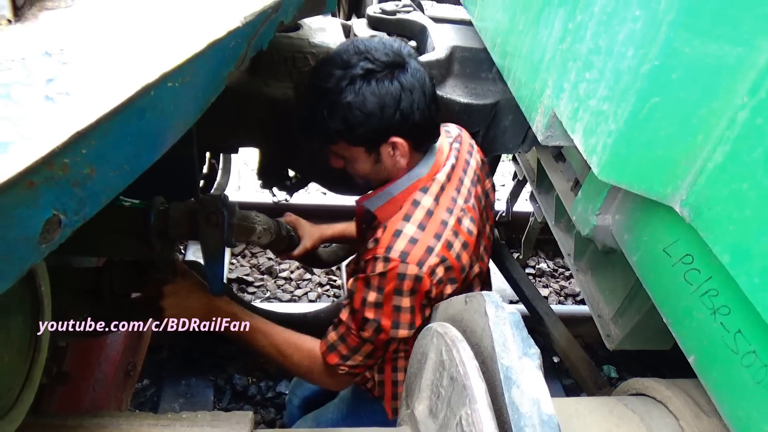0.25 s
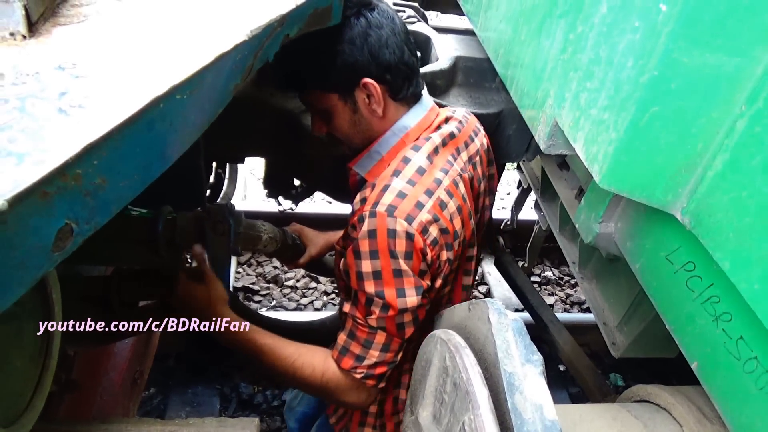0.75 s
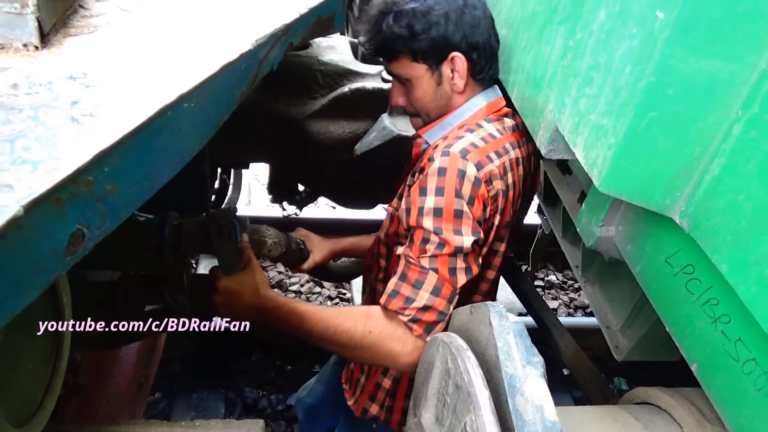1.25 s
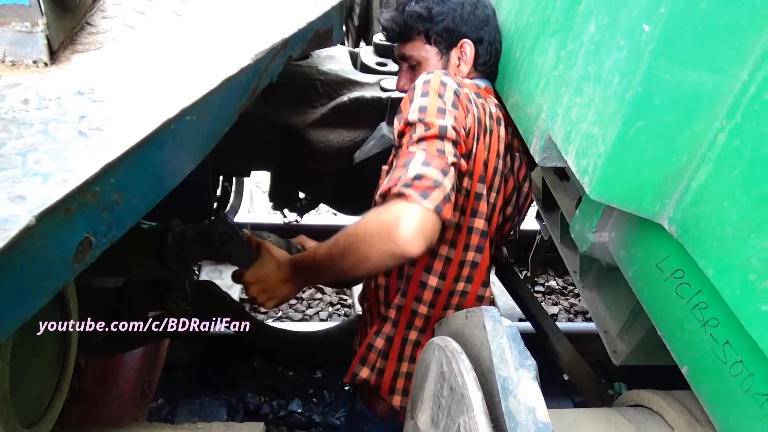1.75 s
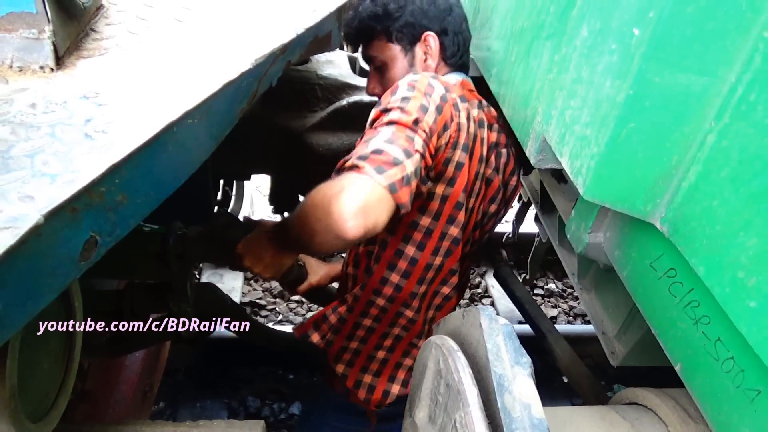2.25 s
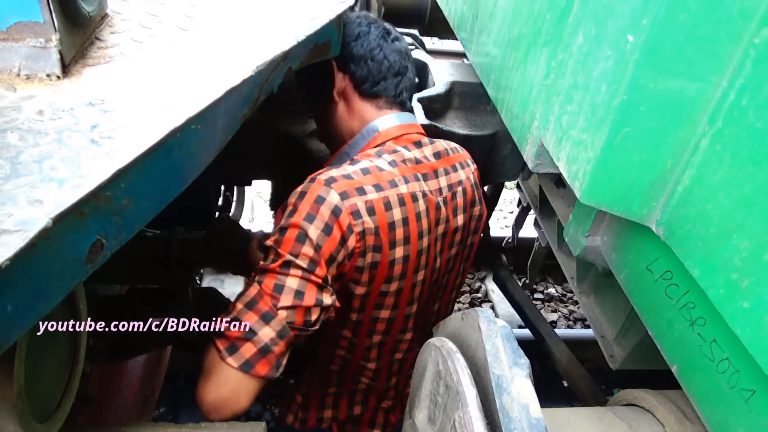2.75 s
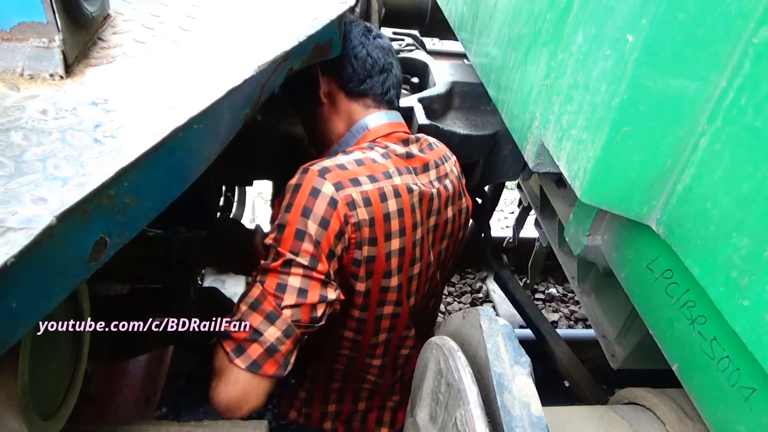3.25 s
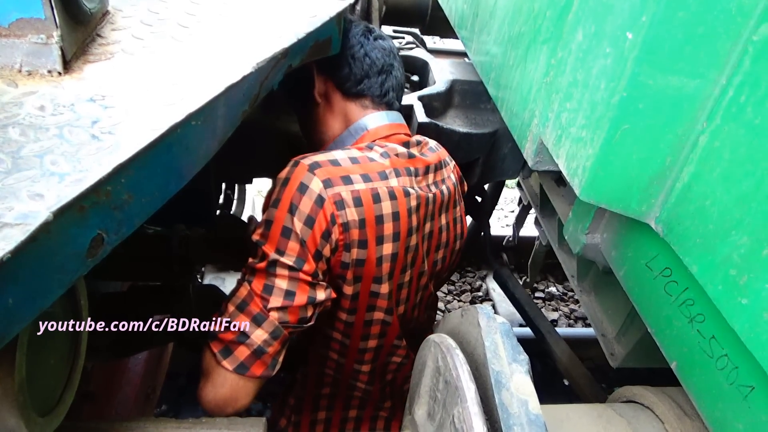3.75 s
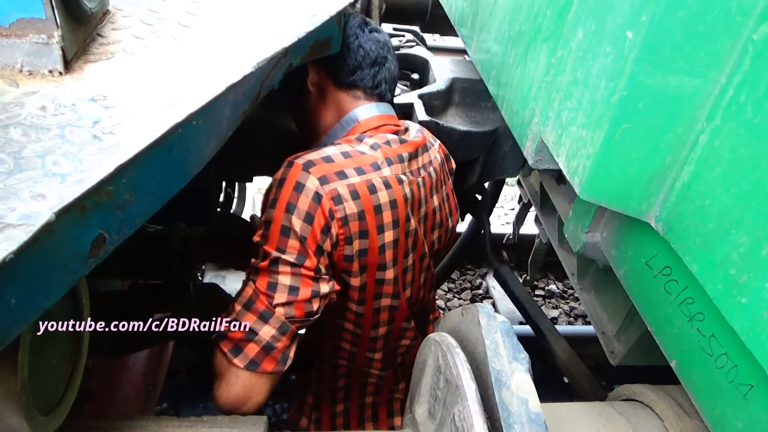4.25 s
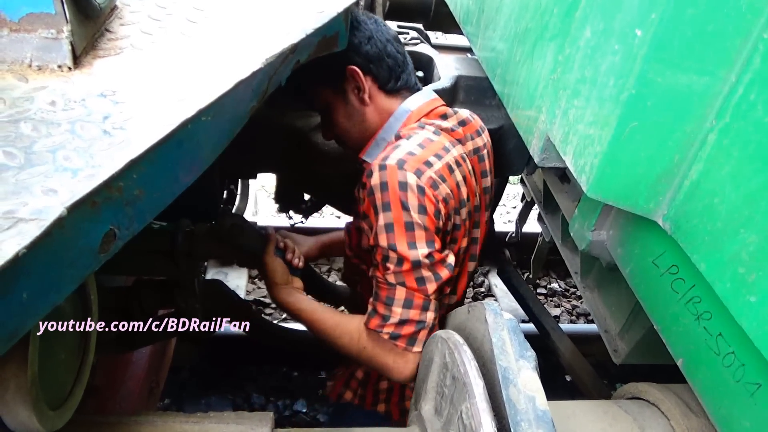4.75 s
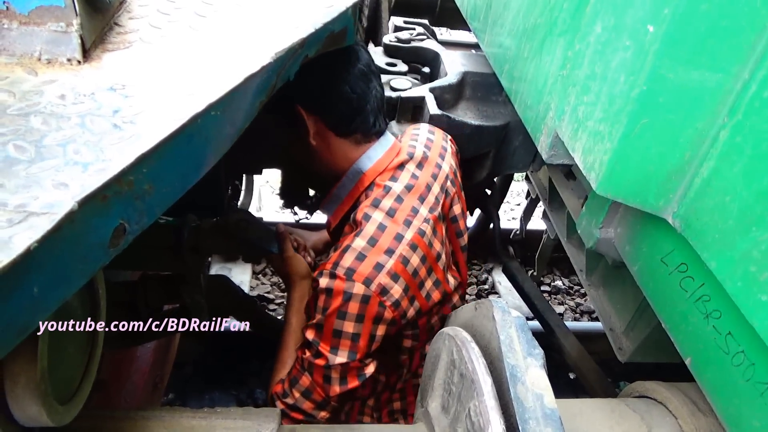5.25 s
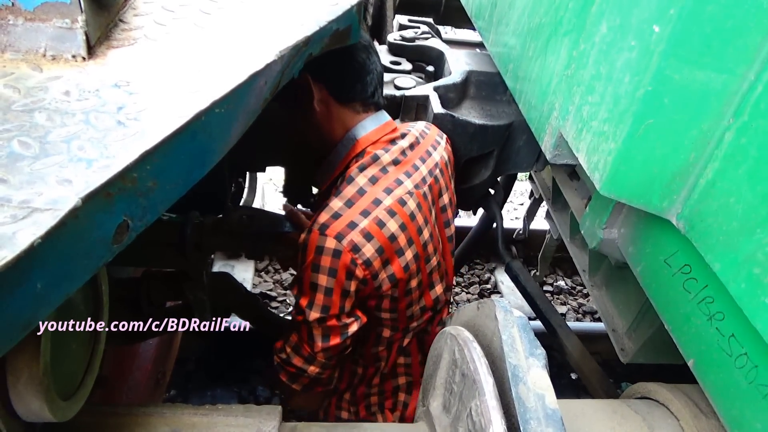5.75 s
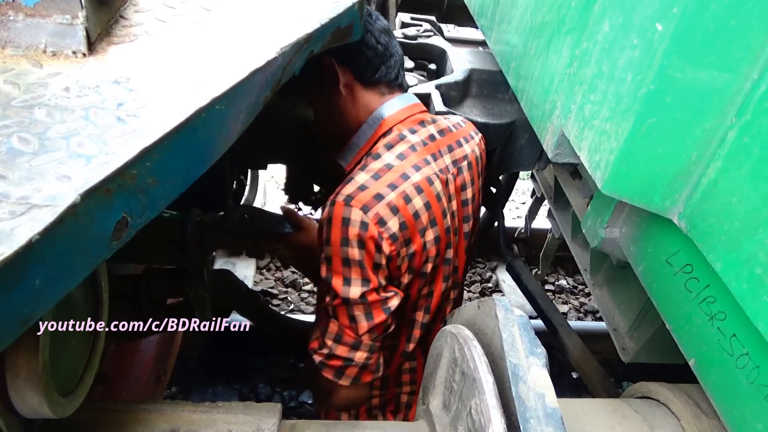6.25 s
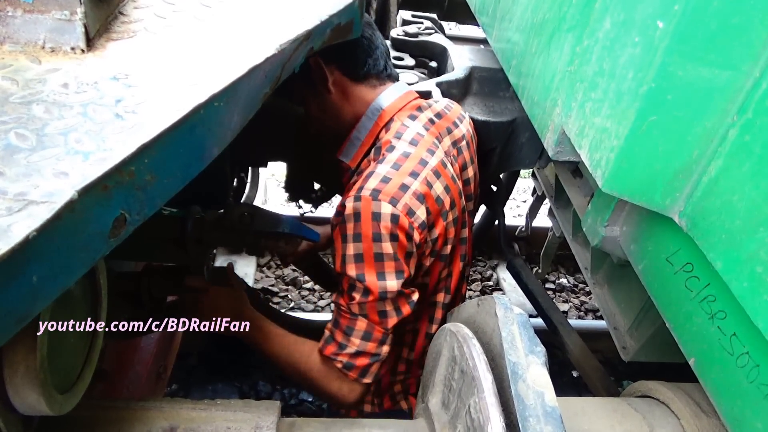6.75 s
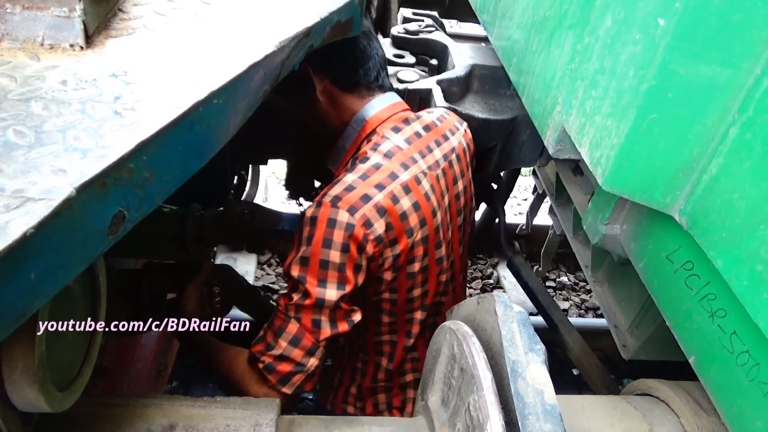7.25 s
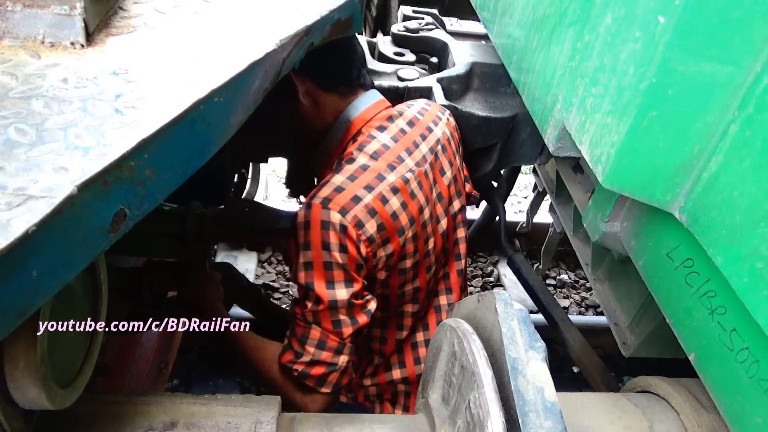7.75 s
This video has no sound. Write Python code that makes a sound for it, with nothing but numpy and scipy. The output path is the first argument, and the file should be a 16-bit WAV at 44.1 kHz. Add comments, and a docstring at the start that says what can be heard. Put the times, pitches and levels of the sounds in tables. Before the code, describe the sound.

Compressed air roars and hisses harshly from an opened brake hose beside an idling locomotive, shuts off abruptly, then three soft puffs escape.

```python
"""Between a diesel locomotive and its coach: a big engine idles, its blower whining, as a worker bleeds a brake hose.
Engine: clatter repeated per four-stroke cycle, exhaust notes, loping boom. Blower: partly unsteady tones.
Air cock: knocks are ringing noise bursts, the seep and whistle resonated noise, puffs and blast coloured noise.
Soft puffs come before and after the four-second blast; a thin leak follows it.
Steel walls echo the air; automatic gain control ducks under loud treble and creeps back."""
import sys
import numpy as np
from scipy import signal
from scipy.fft import rfft, irfft
from scipy.io import wavfile
from scipy.ndimage import uniform_filter1d

SR = 44100
rng = np.random.default_rng(int(sys.argv[2]) if len(sys.argv) > 2 else 0)


def transcribe(u):
    """Save the signal u as a 16-bit wav file named by the first command-line argument.

    u: samples, shape (n,) or (channels, n), limited to [-1, 1]; the rate is SR.
    q: integer samples, one column per channel.
    """
    v = np.clip(np.atleast_2d(u).T, -1, 1)
    q = np.round(v * 32767).astype(np.int16)
    wavfile.write(sys.argv[1], SR, q)


N = 352800
T = np.arange(N) / SR
HZ = np.maximum(np.arange(N // 2 + 1) * SR / N, 1)
LEFT_RIGHT = np.array([[1], [-1]])
# listener's share of the way from the first place to the second
LATER = np.clip((T - 1.5) / 4, 0, 1)

# blower speed, geared to the engine: [t/s, fundamental f/Hz]
BLOWER_SPEED = [(0, 123.8), (.4, 123.7), (1.2, 123.4), (5.8, 122.8), (7, 122.6), (7.6, 121.7), (8, 121.2)]
BLOWER_CYCLES_PER_ENGINE_CYCLE = 36.73
# spectrum of low-pressure air: [f/Hz, relative level/dB]
PUFF_SPECTRUM = [(300, -18), (1500, -8), (2600, -5.5), (4500, -5.5), (6500, -4.5), (8500, 0.5),
                 (11000, -2.5), (12200, -11), (15500, -19)]
# scattered sound of the engine, then of the air: [f/Hz, side minus mid level/dB]
ENGINE_SIDE = [(60, -29), (200, -23.5), (600, -8.5), (1200, -3), (2400, -5.5), (4400, -5), (8000, -6.5),
               (15000, -25.5)]
JET_SIDE = [(60, -13.5), (110, -14), (200, -14), (380, -1), (700, -3.5), (1290, -2), (2380, -6.5),
            (4400, -10.5), (8120, -11), (15000, -26)]

# cock: cracks open, is half turned TURN_S later, is slammed shut
CRACK_S, TURN_S, SHUT_S = 1.176, .3, 5.636
# initial ramp of every escape of air
ATTACK_S = 0.0091


def undb(db):
    """Decibels to gain."""
    return 10 ** (np.asarray(db) / 20)


def unit(x):
    """Scale to rms 1."""
    return x / np.sqrt(np.mean(np.abs(x) ** 2))


def curve(rows):
    """One control per column, joined by straight lines in time."""
    s, *columns = np.transpose(rows)
    return [np.interp(T, s, c) for c in columns]


def colour(points):
    """Gain at every frequency from (Hz, dB) points, interpolated over log frequency."""
    hz, db = np.transpose(points)
    return undb(np.interp(np.log(HZ), np.log(hz), db))


def resonance(hz, width_hz):
    """Complex response of one resonator, peak gain 1."""
    return 1 / (1 + 1j * (HZ ** 2 - hz ** 2) / (HZ * width_hz))


def noise():
    """Two unrelated white noises."""
    return rng.standard_normal((2, N))


def stereo(pair, response, side):
    """Filter two excitations into mid and side; return left and right, mid at rms 1."""
    mid_side = np.array([np.ones(len(HZ)), colour(side)])
    mid, wide = irfft(rfft(pair) * response * mid_side, N)
    return (mid + LEFT_RIGHT * wide) / np.std(mid)


def walk(rate_hz):
    """Smooth random motion with rms 1."""
    k = int(SR / rate_hz)
    steps = np.repeat(rng.standard_normal(N // k + 2), k)
    smooth = uniform_filter1d(steps, k)
    return unit(smooth[rng.integers(k):][:N])


def tone(phase, side_db):
    """A tone whose reflections reach the two ports out of step."""
    side = undb(side_db) * np.exp(2j * np.pi * rng.random())
    return np.sqrt(2) * np.real(phase * (1 + LEFT_RIGHT * side))


def swell(start_s, rise_db, rise_s, hold_s, fade_db_per_s):
    """Gain of an escape of air: quick attack, swell to 1, hold, fade."""
    age = T - start_s
    rise = rise_db * np.clip(age / rise_s - 1, -1, 0)
    fade = fade_db_per_s * np.maximum(age - rise_s - hold_s, 0)
    return np.clip(age / ATTACK_S, 0, 1) * undb(rise - fade)


def walls(x, echo=0.075, sway_s=.00004, count=9):
    """Short echoes off the steel around the hose; their paths drift as the hand moves."""
    out = x
    for lag_s in rng.uniform(.003, .018, count):
        source_s = T - lag_s - sway_s * walk(1.3)
        at = np.clip(np.rint(source_s * SR).astype(int), 0, N - 1)
        out = out + echo * x[:, at]
    return out / np.sqrt(1 + count * echo ** 2)


def engine(cycle, clatter_db=-20.5, repeat=.4, firing_depth=0.14, notes_db=-1, boom_db=-31,
           lope_depth=0.54, half_lope_depth=.35):
    """Each four-stroke cycle repeats its clatter; gas noise pulses at every firing, over a loping boom."""
    cylinders = 16
    # mechanical and gas noise: [f/Hz, relative density/dB per Hz]
    clatter_spectrum = [(25, -21), (60, -5.5), (130, -1.5), (220, -5.5), (380, -4.5), (600, -10.5),
                        (850, -10.5), (1230, -9.5), (1350, -20.5), (1680, -15), (2100, -23), (4000, -34.5),
                        (7500, -41.5), (10500, -39.5), (15500, -60.5)]
    # exhaust notes: [multiple of the cycle, rounded on use; relative level at first/dB; later/dB]
    exhaust = [(19, -38.5, -45), (26, -37.5, -36), (29, -37.5, -46.5), (32, -31, -33.5), (33, -32, -34),
               (42, -38, -31.5), (46, -38, -35.5), (48, -30.5, -38), (50, -38.5, -36), (58, -33.5, -39),
               (60, -42.5, -30), (78.55, -32.5, -32.5), (84.5, -43.5, -31.5)]

    cycle_samples = SR * BLOWER_CYCLES_PER_ENGINE_CYCLE / BLOWER_SPEED[0][1]
    repeated = noise()[:, (cycle % 1 * cycle_samples).astype(int)]
    share = np.clip(repeat, 0, 1)
    firing = 1 + firing_depth * np.cos(2 * np.pi * cylinders * cycle)
    excitation = firing * (np.sqrt(share) * repeated + np.sqrt(1 - share) * noise())
    clatter = stereo(excitation, colour(clatter_spectrum), ENGINE_SIDE)

    notes = 0
    for k, first_db, later_db in exhaust:
        phase = np.exp(2j * np.pi * (round(k) * cycle + rng.random()))
        level = undb(first_db + LATER * (later_db - first_db))
        notes = notes + level * tone(phase, side_db=-23)

    # unequal cylinders make the deepest note dip twice a cycle
    turn = 2 * np.pi * (cycle - .19)
    lope = 1 - lope_depth * np.cos(turn) - half_lope_depth * np.cos(2 * turn)
    boom = unit(lope * np.sin(2 * np.pi * (cylinders - 1) * cycle))
    return undb(clatter_db) * clatter + undb(notes_db) * notes + undb(boom_db) * boom


def blower(turns, flutter_rate_hz=22, later_unsteady=0.38):
    """Lobe and gear tones, each partly smeared by turbulent air, more so later."""
    # [multiple of the fundamental, level at first/dB, level later/dB, unsteady share at first/0-1]
    whine = [(1, -36.5, -45.5, 0.34), (1.435, -46.5, -29.5, 0.1), (2, -26, -38, 0.1),
             (2.845, -33, -28.5, .5), (2.875, -41, -42, 0.5), (3, -30, -34.5, 0.5), (4, -42, -47, 0.8),
             (4.52, -36, -35, 0.4), (4.63, -43, -42, 0.4), (5, -28.5, -35, 0.1), (6, -25.5, -29.5, 0.34),
             (7, -37, -33.5, 0.97), (8, -36, -32, .2), (9.05, -36, -35, .95), (10, -45, -41.5, 0.9),
             (12.03, -38.5, -43.5, 0.7), (13.03, -40.5, -38, 0.97), (14.06, -40.5, -39.5, 0.97)]
    out = 0
    for k, first_db, later_db, unsteady in whine:
        share = np.clip(unsteady + later_unsteady * LATER, 0, 1)
        turbulence = unit(walk(flutter_rate_hz) + 1j * walk(flutter_rate_hz))
        flutter = np.sqrt(1 - share ** 2) + share * turbulence
        phase = flutter * np.exp(2j * np.pi * (k * turns + rng.random()))
        level = undb(first_db + LATER * (later_db - first_db))
        out = out + level * tone(phase, side_db=-11.5)
    return out


def from_the_side(x, later_share=.2):
    """Sound from one side reaches the two ports out of phase, less so later."""
    # engine off to one side, as at first: [f/Hz, phase lead of the left port/rad]
    port_phase = [(50, -.5), (120, -.8), (250, -1.35), (450, -.85), (700, -.7), (1030, -.8), (1460, -.3),
                  (5000, -.3), (10000, 0)]
    hz, radians = np.transpose(port_phase)
    half = np.interp(np.log(HZ), np.log(hz), radians) / 2
    side = irfft(rfft(x) * 1j * np.tan(half), N)
    return x + LEFT_RIGHT * side * (1 + LATER * (later_share - 1))


def rumble(rumble_db=-29):
    """Toward the second place more of the engine's rumble comes through under the frame."""
    return stereo(noise(), resonance(170, 260) ** 2, ENGINE_SIDE) * undb(rumble_db) * LATER


def handle():
    """The handle knocks against its stop in short, bright, decaying noise bursts."""
    # [t/s, level/dB, t60/s, resonator f/Hz, resonator width/Hz]
    clicks = [(0.2277, -24.5, 0.036, 4400, 4000), (0.2255, -21, 0.028, 7640, 7000),
              (.243, -32, .04, 7500, 7000), (.2472, -36, 0.036, 9000, 7000),
              (.7708, -28.5, .018, 8600, 2600), (.776, -38, .05, 8700, 3000)]
    out = 0
    for s, db, t60_s, hz, width_hz in clicks:
        ring = (T >= s) * np.exp(-np.log(1000) * np.abs(T - s) / t60_s)
        response = resonance(hz, width_hz) ** 2 * colour(PUFF_SPECTRUM)
        out = out + undb(db) * ring * stereo(noise(), response, JET_SIDE)
    return out


def slit(modes, flow, widen, flutter_db):
    """Air squeezed through the barely open cock rings its cavities."""
    power = sum(np.abs(undb(db) * resonance(hz, widen * width_hz)) ** 2 for hz, width_hz, db in modes)
    return stereo(noise(), np.sqrt(power), JET_SIDE) * flow * undb(flutter_db * walk(55.05))


def singing():
    """The slit squeaks faintly at the first seep, then whistles as the cock is turned."""
    # cavity resonances: [f/Hz, width before widening/Hz, relative level/dB]
    seep_modes = [(3260, 75, -1), (5350, 53, -3.5), (7080, 78, -10), (8230, 69, -8.5), (9200, 36, -1.5),
                  (9810, 40, -2.5), (11520, 35, -6), (14300, 39, -19)]
    whistle_modes = [(2920, 77, -2.5), (3430, 90, -9.5), (3545, 24, 2), (3980, 60, -9), (5200, 54, -10),
                     (5930, 39, 1), (6320, 69, 3), (6930, 63, -6.5), (7330, 59.5, -9), (8330, 55, -5),
                     (8700, 45, -2), (9400, 41, -6), (9850, 63.3, 2), (10300, 60, -0.5), (10400, 80, -2),
                     (11000, 35, -5.5), (11700, 60, -2.5), (12500, 40, -10), (13200, 150, -9.5),
                     (13900, 39.6, -17)]
    # the knock of the handle sets off the seep
    seep = undb(-39.5) * swell(0.23, rise_db=14, rise_s=0.11, hold_s=.06, fade_db_per_s=65.5)
    # the whistle grows as the cock turns and dies away once it is wide open
    whistle = undb(-4) * swell(CRACK_S, rise_db=24.5, rise_s=0.24, hold_s=.2, fade_db_per_s=25)
    return (slit(whistle_modes, whistle, widen=1.3, flutter_db=1.6)
            + slit(seep_modes, seep, widen=2.2, flutter_db=.5))


def puffs(rise_db=7, flutter_db=.35):
    """Low-pressure air escapes in soft, broad, smoothly swelling puffs."""
    # [start t/s, peak level/dB, swell time/s, fade/dB per s]
    puff_events = [(.405, -46, .02, 150), (.485, -38.5, 0.065, 110), (6.755, -45, .02, 30),
                   (6.99, -13, 0.1, 80), (7.175, -18.5, .07, 130), (7.338, -13.5, 0.094, 83)]
    power = sum((undb(db) * swell(s, rise_db, rise_s, 0, fade_db_per_s)) ** 2
                for s, db, rise_s, fade_db_per_s in puff_events)
    air = stereo(noise(), colour(PUFF_SPECTRUM), JET_SIDE)
    return walls(air * np.sqrt(power) * undb(flutter_db * walk(40)))


def opening(ease_s=0.043, crack_gap_db=-56.5, shut_db_per_s=600):
    """Share of the cock's bore that is open: a crack, an eased turn, a slam."""
    turned = .5 + .5 * np.tanh((T - CRACK_S - TURN_S) / (2 * ease_s))
    cracked = np.clip((T - CRACK_S) / ATTACK_S, 0, 1)
    shut = undb(-shut_db_per_s * np.maximum(T - SHUT_S, 0))
    return cracked * (undb(crack_gap_db) + turned) * shut


def blast(flutter_db=.35):
    """The free jet hisses near 9.5 kHz, tinted by its pipe; louder, with more roar, at first pressure."""
    # free jet: [f/Hz, relative level/dB]
    jet_spectrum = [(60, -33.5), (250, -23), (520, -22.5), (650, -14.5), (850, -20), (1200, -20.5),
                    (2000, -16), (4000, -13.5), (6000, -10), (7800, -5), (8900, -1.5), (10200, -1),
                    (12000, -7), (15500, -15.5)]
    # pipe resonances: [f/Hz, width/Hz, level relative to the hiss there/dB]
    pipe_modes = [(3436, 42, 1), (3550, 45, 0), (4070, 40, 2), (4660, 40, 1), (5050, 45, 0), (5220, 60, -1),
                  (5720, 50, -1), (8720, 40, -3.5), (8960, 60, -1.5), (9530, 60, -1.5), (10200, 50, -1)]
    jet_db, surge_db, surge_s = 11, 3.5, 1.3
    roar_db, roar_surge_db = -28.5, 14.5  # relative to the hiss
    yard_db, yard_db_per_s = -22.5, 115

    bore = opening()
    surge = 1 / (1 + ((T - CRACK_S - TURN_S) / surge_s) ** 4)
    # the yard echoes the jet after shutting, then a last spill escapes
    yard = (T > SHUT_S) * undb(yard_db - yard_db_per_s * np.abs(T - SHUT_S))
    spill = undb(-22) * swell(5.798, rise_db=0, rise_s=ATTACK_S, hold_s=.07, fade_db_per_s=59)
    jet_flow = undb(jet_db + surge_db * surge) * np.hypot(bore, yard)
    flow = np.hypot(jet_flow, spill)

    pipe_power = sum(np.abs(undb(db) * resonance(hz, width_hz)) ** 2 for hz, width_hz, db in pipe_modes)
    hiss = stereo(noise(), colour(jet_spectrum) * np.sqrt(1 + pipe_power), JET_SIDE)
    roar_gain = undb(roar_db + roar_surge_db * surge * bore ** 4)
    roar = stereo(noise(), resonance(2100, 4800), JET_SIDE) * roar_gain
    return walls((hiss + roar) * flow * undb(flutter_db * walk(25)))


def shriek():
    """The narrow gap also radiates near-ultrasound: unheard, but it drives the gain control down."""
    above_hearing = resonance(19500, 1500) ** 4
    flow = swell(CRACK_S, rise_db=70, rise_s=0.27, hold_s=0.063, fade_db_per_s=300)
    return stereo(noise(), above_hearing, JET_SIDE) * undb(10.5) * flow


def leak(whistle_db=-47, hiss_db=-55, rush_db=-41):
    """After the blast the seal sings and hisses thinly, scattered by the steel around it."""
    whistle = undb(whistle_db) * stereo(noise(), resonance(6400, 220), ENGINE_SIDE)
    hiss = undb(hiss_db) * stereo(noise(), colour(PUFF_SPECTRUM), ENGINE_SIDE)
    rush = undb(rush_db) * stereo(noise(), resonance(2300, 2800) ** 2, ENGINE_SIDE)
    return (whistle + hiss + rush) * (T > SHUT_S)


def scene():
    """The idling locomotive behind the work at the hose."""
    turns = np.cumsum(curve(BLOWER_SPEED)[0]) / SR
    machine = engine(turns / BLOWER_CYCLES_PER_ENGINE_CYCLE) + blower(turns)
    locomotive = from_the_side(machine) + rumble()
    return locomotive + handle() + singing() + puffs() + blast() + shriek() + leak()


def gain_control(x, threshold_db=-24.5, ratio=3.067, recover_db_per_s=4.0, attack_s=0.02):
    """Loud treble pulls the gain down quickly; it climbs back at a slow, steady rate."""
    high_pass = signal.butter(2, 2500, "high", fs=SR, output="sos")
    treble = signal.sosfilt(high_pass, x.mean(axis=0))
    keep = np.exp(-1 / (attack_s * SR))
    power = signal.lfilter([1 - keep], [1, -keep], treble ** 2)
    level_db = 10 * np.log10(power + 1e-12)
    cut_db = np.maximum(level_db - threshold_db, 0) * (1 - 1 / ratio)
    recovery_db = recover_db_per_s * T
    held_db = np.maximum.accumulate(cut_db + recovery_db) - recovery_db
    return x * undb(-held_db)


def record(dry):
    """Tilt the ports' balance, ride the gain, round the highest peaks and cut the top."""
    # port balance: [f/Hz, left minus right level/dB]
    tilt = [(60, -0.5), (250, -0.3), (650, 0.5), (1400, 0.2), (5000, -0.5), (9000, 1.7), (13000, -0.8)]
    balanced = irfft(rfft(dry) * colour(tilt) ** (LEFT_RIGHT / 2), N)
    ridden = gain_control(balanced)
    rounded = ridden / (1 + (ridden / .7) ** 8) ** (1 / 8)  # ceiling .7
    low_pass = signal.ellip(12, .1, 80, 15800, fs=SR, output="sos")
    return signal.sosfilt(low_pass, rounded)


dry = scene()
out = record(dry)
transcribe(out)
```